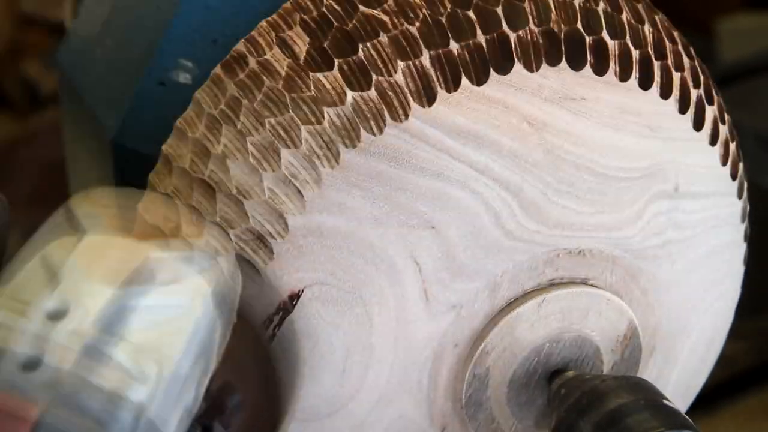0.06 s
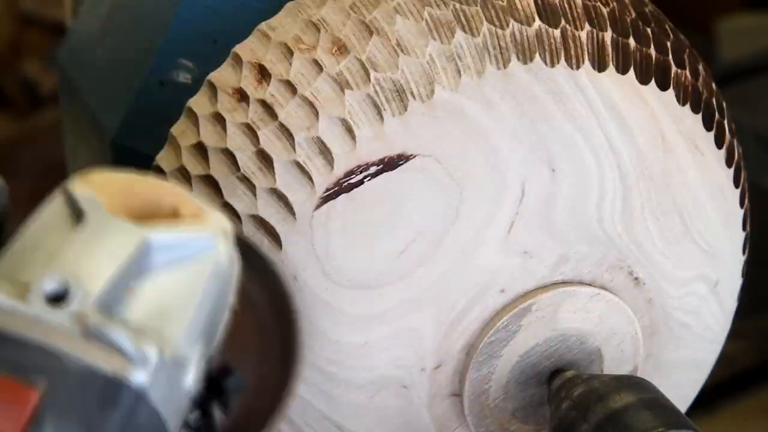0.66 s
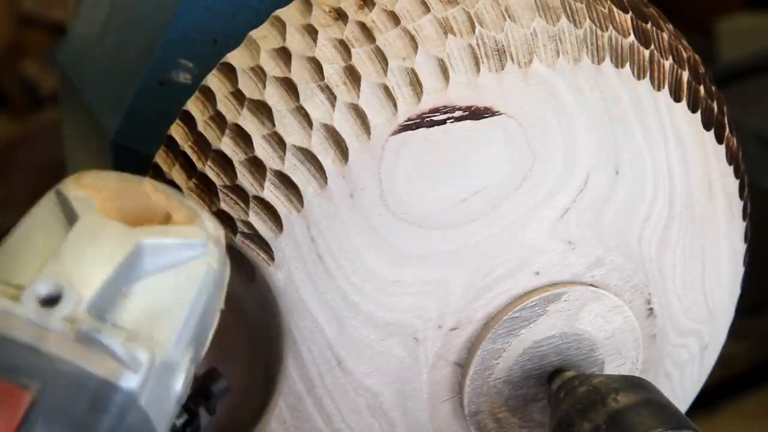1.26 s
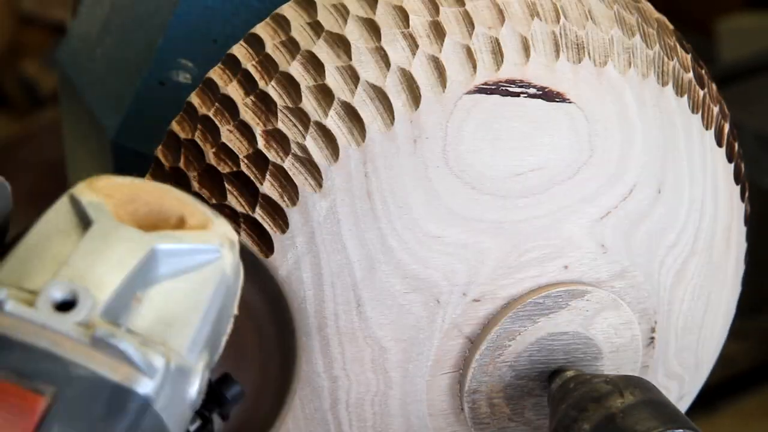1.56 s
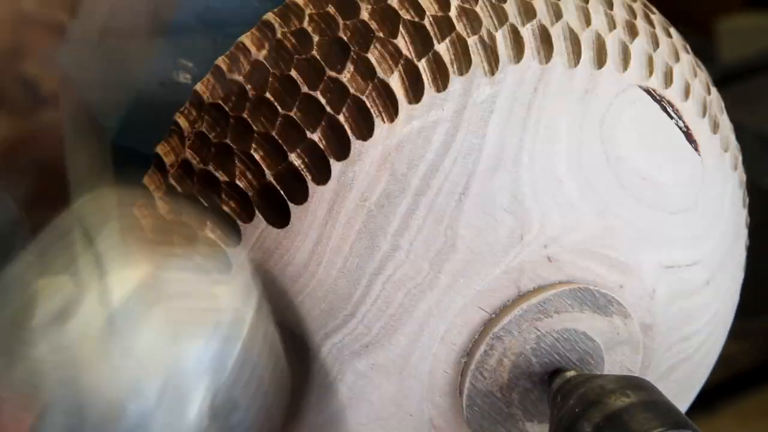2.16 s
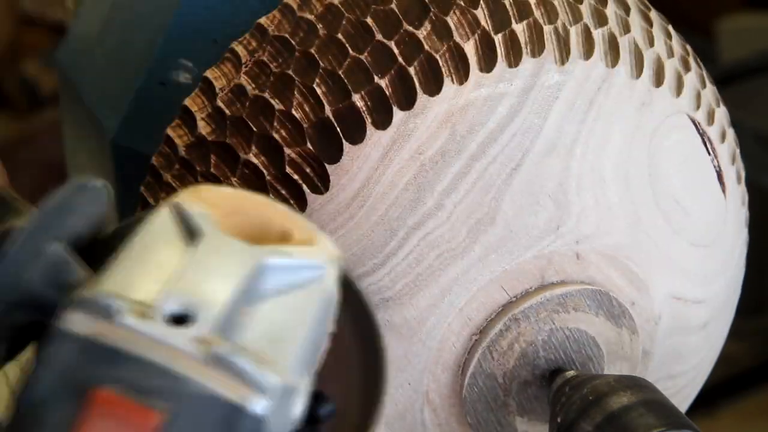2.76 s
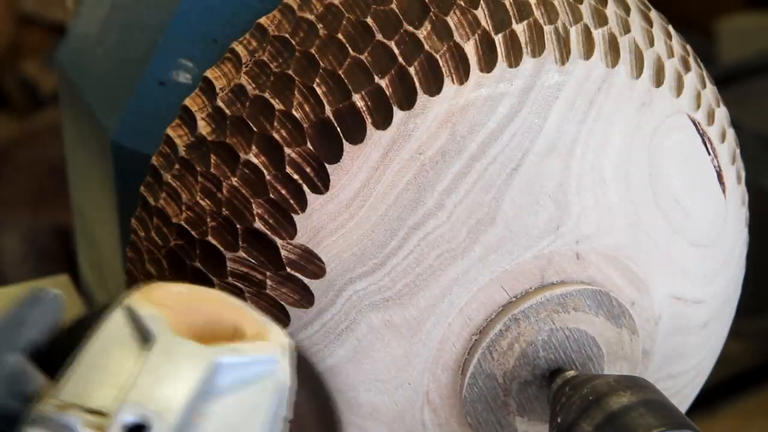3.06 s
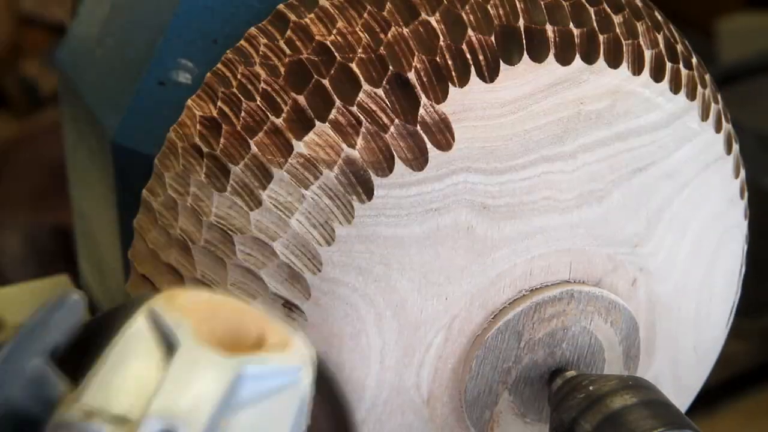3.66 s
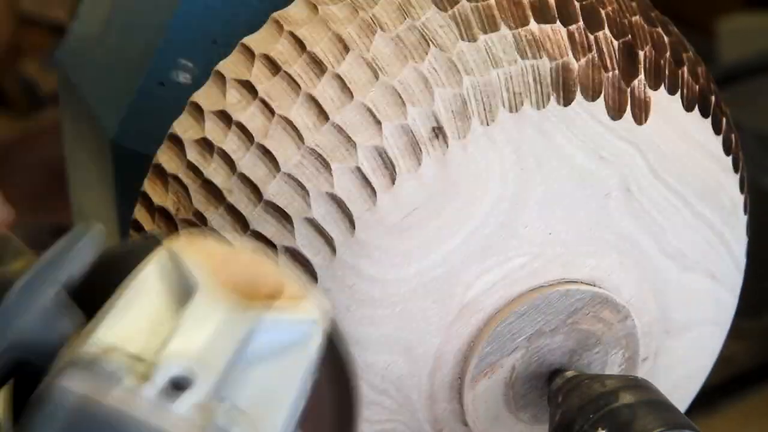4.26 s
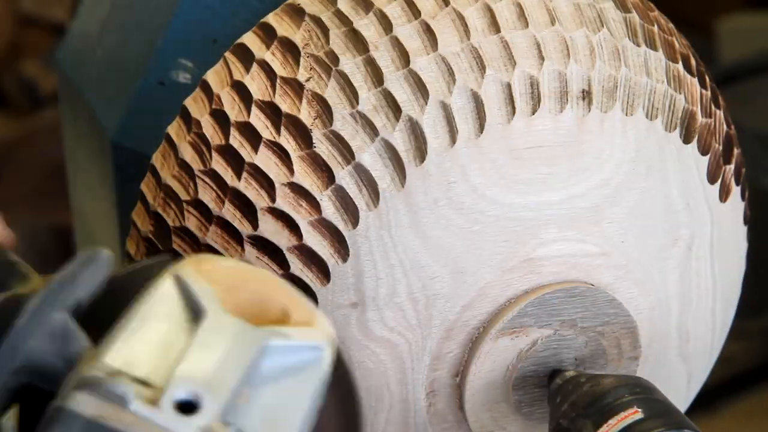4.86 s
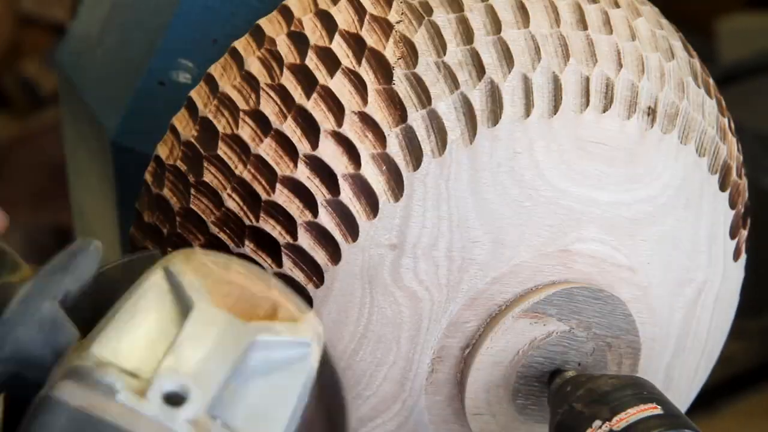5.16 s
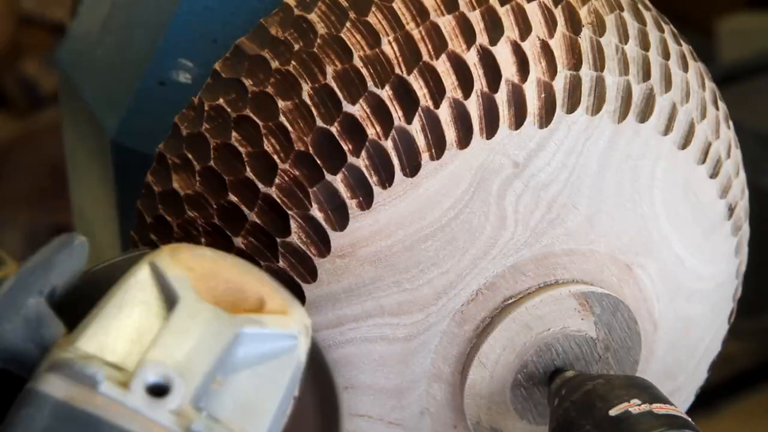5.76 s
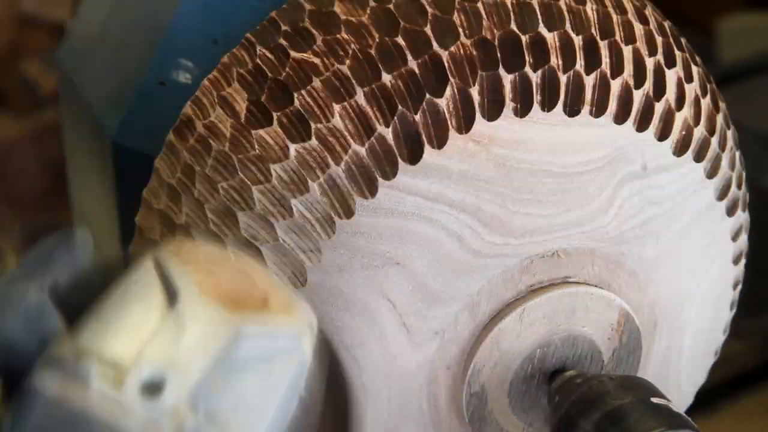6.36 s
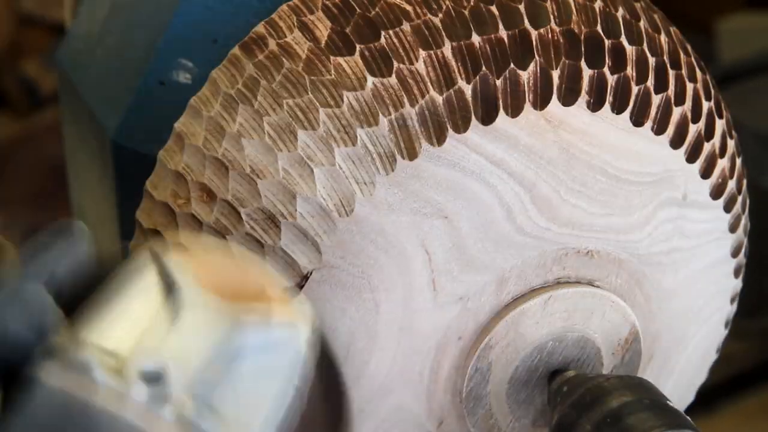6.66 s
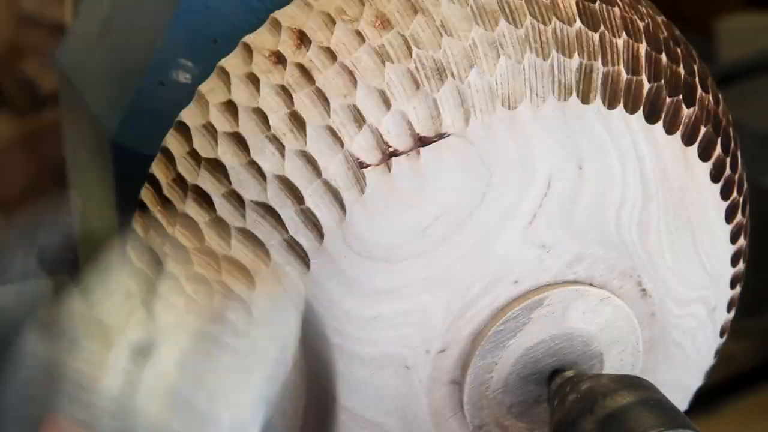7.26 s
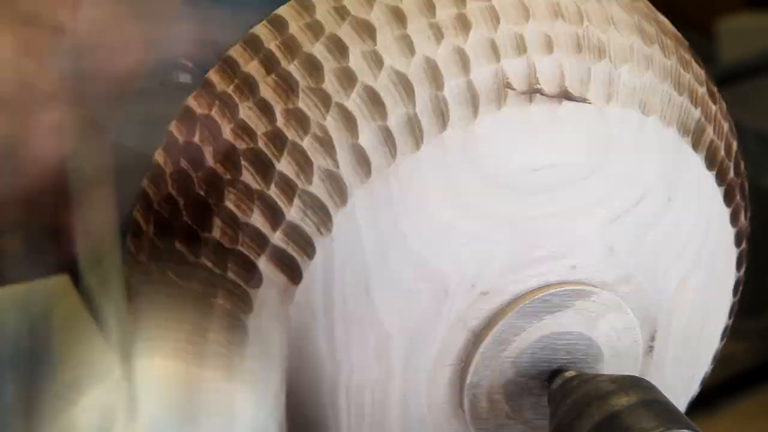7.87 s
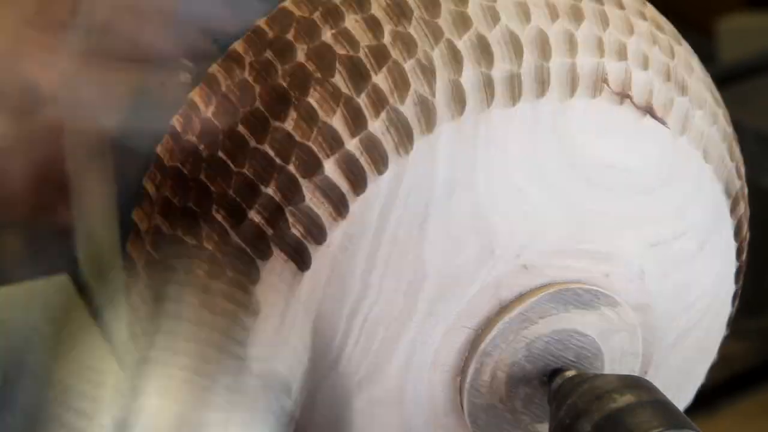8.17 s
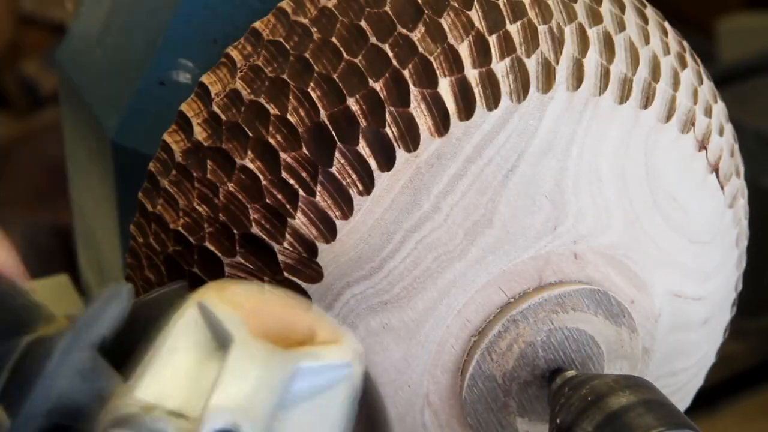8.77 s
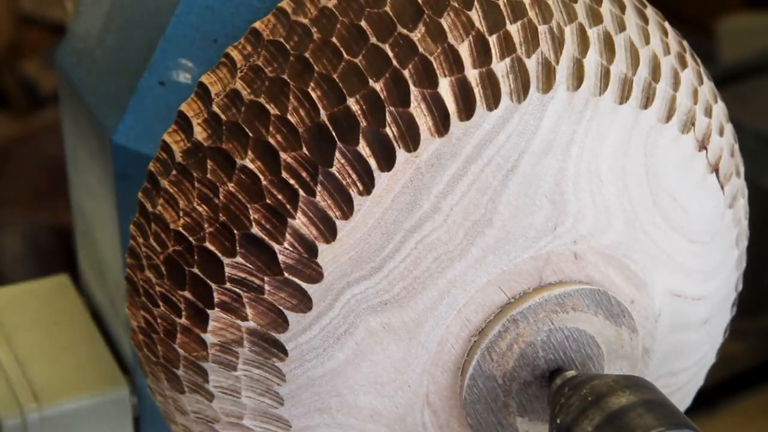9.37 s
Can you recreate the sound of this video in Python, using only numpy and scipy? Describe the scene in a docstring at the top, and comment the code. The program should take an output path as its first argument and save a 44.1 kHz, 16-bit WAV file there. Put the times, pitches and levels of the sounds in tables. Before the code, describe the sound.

A small angle grinder is already running at the start, close by, with a high gear whine over a bright, continuous fan hiss and a faint lower rush of air. Until about 8.5 seconds it carves a wooden bowl in quick groups of mostly three or four short cuts, roughly three groups a second. Each cut gives a brief rasp and a faint hum from the wood, and drags the motor pitch down. In the tiny pauses the whine climbs back with a slight puff of air, making a regular wavering rhythm. The rasps are strongest in the first second and from about 3 to 4 seconds, and lightest around 8 seconds. At about 8.6 seconds the disc lifts off with a soft, rising swish. The grinder then runs free with an even whine and hiss until the end, at about 9.4 seconds.

```python
"""Gear whine over the hiss of a cooling fan: an angle grinder scooping small hollows into a wooden bowl,
mostly three or four quick cuts to a row. Each cut makes the toothed disc rasp and the bowl hum, and drags
the motor down. Between rows air puffs through the guard and the whine climbs back.
At the end the disc lifts off with a swish, and the tool is drawn back and runs free."""
import sys
import numpy as np
from scipy import signal
from scipy.fft import rfft, irfft, next_fast_len
from scipy.io import wavfile
from scipy.ndimage import uniform_filter1d, map_coordinates

SR = 44100
rng = np.random.default_rng(int(sys.argv[2]) if len(sys.argv) > 2 else 0)


def wav_out(sig):
    """Save sig, one row per channel (or a flat mono array), as 16-bit PCM at SR to the path in sys.argv[1]."""
    wavfile.write(sys.argv[1], SR, np.round(np.clip(np.atleast_2d(sig).T, -1, 1) * 32767).astype(np.int16))


N = 414981
TIME = np.arange(N) / SR
PINION_TEETH, CROWN_TEETH, DISC_TEETH = 12, 37, 4


def amp(db):
    """Decibels to gain."""
    return 10 ** (np.asarray(db) / 20)


def unit(x):
    """Scale to rms 1."""
    return x / np.sqrt(np.mean(x ** 2) + 1e-20)


def curves(rows):
    """One value per sample for each column after the time."""
    times, *columns = np.transpose(rows)
    return [np.interp(TIME, times, column) for column in columns]


def wobble(rate_hz):
    """Smooth random curve, rate_hz knots a second."""
    knots = rng.standard_normal(int(N * rate_hz / SR) + 4)
    return map_coordinates(knots, [TIME * rate_hz], mode="nearest")


def noise(spectrum):
    """Noise of rms 1 coloured by (Hz, dB) points."""
    size = next_fast_len(N + 8192)
    hz, db = np.transpose(spectrum)
    gain = amp(np.interp(np.log(np.fft.rfftfreq(size, 1 / SR) + 1), np.log(hz), db))
    return unit(irfft(rfft(rng.standard_normal(size)) * gain, size)[:N])


def angle(hz):
    """Running phase of a changing frequency."""
    return 2 * np.pi * np.cumsum(hz) / SR


def tone(phase):
    """Sine of rms 1."""
    return np.sqrt(2) * np.sin(phase)


def resonance(phase, width_hz):
    """Noise band of rms 1 that follows the given phase."""
    return unit(wobble(width_hz) * np.cos(phase) + wobble(width_hz) * np.sin(phase))


def swells(times, sizes, width_s, delay_s=0, edge=2):
    """One swell at each time; a higher edge gives a flatter top and steeper sides."""
    out = np.zeros(N)
    for peak_s, size in zip(times + delay_s, sizes):
        near = slice(max(0, int((peak_s - .1) * SR)), int((peak_s + .1) * SR))
        out[near] += size * np.exp(-.5 * np.abs((TIME[near] - peak_s) / width_s) ** edge)
    return out


# Unloaded shaft tones as the hand turns the tool. Each row: time in seconds, orders 1 and 2 in dB.
SHAFT_LEVELS = [(0, -52, -61), (1.9, -51, -63), (2.23, -52, -43), (2.7, -55, -59), (4.5, -46, -62),
                (5.7, -49, -67), (6.6, -45, -55), (8.2, -55, -65)]
# Pauses between rows. Each row: time in seconds, then air puff, order 4, gear mesh and its octave in dB.
ROW_PAUSES = [(0, -38, -49, -39, -35), (.3, -39, -45, -43, -24), (.63, -49, -47, -38, -28),
              (1.01, -40, -35, -37, -29), (1.18, -48, -52, -31, -27), (1.53, -43, -48, -44, -29),
              (1.83, -45, -32, -44, -33), (2.18, -33.5, -49, -37, -28), (2.68, -38, -44.5, -33.5, -26.5),
              (3.19, -43, -43, -46, -30), (3.59, -48, -36, -30, -33), (3.91, -43, -46, -38, -28.5),
              (4.28, -50, -47, -26, -37), (4.54, -47, -54, -37, -36), (4.83, -43, -52, -38, -37),
              (5.11, -42, -52, -38, -28), (5.41, -42, -53, -33, -36), (5.75, -46, -53, -33, -30),
              (6.06, -44, -47, -26, -36), (6.39, -39, -36, -25, -36), (6.68, -44, -41, -24, -38),
              (6.99, -44, -40, -26, -37), (7.27, -40, -52, -30, -30), (7.59, -44, -43, -33, -34),
              (7.91, -44, -48, -27, -30), (8.22, -46, -50, -33, -37), (8.56, -44, -50.5, -43, -33)]
# Final free run. Each row: time in seconds, motor speed in Hz, orders 1, 2, 4, 12 and 24 in dB.
FREE_RUNNING = [(8.64, 590, -48, -59, -52, -29, -32), (8.71, 592.0, -49, -59, -40, -28.5, -26),
                (8.812, 594.9, -51, -59, -48, -27, -27), (8.84, 594.4, -42, -50, -48, -38, -27),
                (8.91, 596.4, -43, -55, -38, -29, -30), (8.934, 594.6, -44, -43, -51, -30, -24),
                (8.962, 594.2, -55, -44, -39, -56, -31), (8.98, 594.7, -50, -47, -58, -29, -31),
                (9.014, 590, -46, -45, -49, -29, -27), (9.044, 590, -51, -43, -43, -60, -34),
                (9.08, 593.1, -50, -49, -43, -27, -31), (9.124, 593.8, -46, -41, -37, -47, -32),
                (9.148, 595.8, -48, -42, -40, -29, -31), (9.204, 594.0, -47, -39.5, -54, -26.5, -30),
                (9.31, 592.4, -48, -39, -44, -30, -28), (9.37, 593.9, -49, -45, -55, -34, -27)]


def unloaded_levels_db(whine_lag_s=.044):
    """Level of each motor order with the disc off the wood; the whine peaks just after each puff."""
    low = list(SHAFT_LEVELS) + [(s, one, two) for s, _, one, two, *_ in FREE_RUNNING]
    high = [(s + whine_lag_s, *levels) for s, _, *levels in ROW_PAUSES]
    high += [(s, *levels) for s, _, _, _, *levels in FREE_RUNNING]
    return curves(low) + curves(high)


# Motor tones. Each row: order (multiple of motor speed), loaded level in dB, loss in dB per Hz of sag,
# flutter scale in dB, unloaded fading in dB.
MOTOR_ORDERS = [(1, -40.5, 0.34, 2.5, 1), (2, -51, -.08, 3, 1), (4, -52, .1, 3, 1.5),
                (12, -38.5, 0.26, 4, 1.5), (24, -41, 0.3, 4, 1)]
# Tool angle under load. Each row: time in seconds, tilt from octave to mesh in dB, shaft tone gain in dB.
TOOL_TILT = [(0, 5.5, -3), (2.7, 3.5, -1.5), (3.1, -3.5, 1), (5.2, 2.5, 2), (6.5, -2.5, 1.5),
             (8.5, -0.5, -0.5)]


def motor_and_gears(shaft, sag_hz, load):
    """Shaft tones and the mesh of the bevel gears, which sings loudest without load."""
    backlash = (.0073 + .015 * load) * wobble(300)  # the shaft shudders in the play of the gears
    crown = shaft * PINION_TEETH / CROWN_TEETH
    tilt_db, shaft_db = curves(TOOL_TILT)
    damped = 1 - np.exp(-sag_hz / 8.1)  # the lightest touch damps the singing
    out = np.zeros(N)
    for free_db, (order, loaded_db, loss, flutter_db, fade_db) in zip(unloaded_levels_db(), MOTOR_ORDERS):
        order = round(order)
        mesh, octave = order == PINION_TEETH, order == 2 * PINION_TEETH
        angle_db = tilt_db * (mesh - .6 * octave) + shaft_db * (order <= 2)
        db = (1 - damped) * (free_db + fade_db * wobble(14))
        db += damped * (loaded_db - loss * sag_hz + angle_db)
        db += flutter_db * (.44 + .78 * load) * wobble(85)
        # slightly eccentric gears swell the mesh once a turn
        runout = 1 + (.28 * mesh + .08 * octave) * np.cos(shaft + .5 * wobble(14))
        runout += .073 * (mesh or octave) * np.cos(crown + .5 * wobble(12))
        out += amp(db) * runout * tone(order * (shaft + backlash))
    return out


def turbulence(air, depth_db):
    """Slow, local swells of random gain over pitch and time."""
    spectrum = signal.stft(air, nperseg=512)[2]
    field = rng.standard_normal(spectrum.shape)
    for _ in range(2):
        field = uniform_filter1d(field, size=5, axis=0)
        field = uniform_filter1d(field, size=16, axis=1)
    spectrum *= amp(depth_db * unit(field))
    return unit(signal.istft(spectrum, nperseg=512)[1][:N])


# Fan outlet to wood. Each row: time in seconds, distance in metres.
OUTLET_DISTANCE = [(0, 0.067), (2.7, 0.066), (3.0, 0.061), (8.42, 0.061), (8.75, 0.088), (8.95, .13),
                   (9.41, .15)]


def bowl_reflection(air, load):
    """The wood throws the hiss back; its comb slides as the tool dips in and lifts off."""
    distance_m = curves(OUTLET_DISTANCE)[0] + .0055 * (.7 - load) + .0074 * wobble(9)
    lag_samples = 2 * distance_m / 343 * SR
    echo = map_coordinates(air, [np.arange(N) - lag_samples], mode="nearest")
    return unit(air + .094 * echo)


# Hiss at the bowl, and drawn back. Each row: frequency in Hz, relative density in dB.
NEAR_SPECTRUM = [(60, -70), (700, -30), (1250, -6.5), (1650, 0), (2050, -4.5), (2600, -0.5), (3900, 0.5),
                 (5000, 2), (6300, -2.5), (9000, -1.5), (11500, -0.5), (13600, -4.5), (14500, -5),
                 (15700, -17.5)]
AWAY_SPECTRUM = [(60, -70), (700, -31), (1150, -9), (1600, 2.5), (2300, 1.5), (3100, 3.5), (3900, 1),
                 (5400, 2), (6400, -2), (9000, -0.5), (12000, 2.5), (13500, -2), (14600, -7), (15700, -8)]


def fan_hiss(shaft, load, away):
    """Air from the fan and the spinning disc; the fan blows less when the motor labours."""
    air = np.sqrt(1 - away) * noise(NEAR_SPECTRUM) + np.sqrt(away) * noise(AWAY_SPECTRUM)
    air = bowl_reflection(turbulence(air, depth_db=.83), load)
    level_db = -30 - .75 * load ** 4 + .46 * wobble(25)
    return air * amp(level_db) * (1 + .07 * np.cos(shaft))


# Colour of the cooling air. Each row: frequency in Hz, relative density in dB.
RUSH_SPECTRUM = [(20, -52), (60, -28), (95, -16.5), (135, -22), (220, -10.5), (280, -12), (370, -3.5),
                 (480, -5), (650, 2.5), (950, 3), (1250, -2), (2200, -19.5)]
# Its strength. Each row: time in seconds, level in dB.
RUSH_ENVELOPE = [(0, -47.5), (2.5, -47), (4.2, -45), (5.9, -46.5), (6.9, -45), (7.6, -47), (8.8, -46.5),
                 (8.92, -51), (9.41, -49.5)]


def cooling_rush():
    """Low, wavering rush of the cooling air."""
    return amp(curves(RUSH_ENVELOPE)[0] + 1.4 * wobble(16)) * noise(RUSH_SPECTRUM)


def gap_whistle(away, centre_hz=3270, steady_db=-49, away_db=-42.5):
    """Air resonates in the guard's gap: a puff in each pause, a stronger flow once drawn back."""
    times, puff_db, *_ = np.transpose(ROW_PAUSES)
    flow = amp(steady_db) + swells(times, amp(puff_db), width_s=.02) + amp(away_db) * away
    return flow * amp(1.5 * wobble(30)) * resonance(2 * np.pi * centre_hz * TIME, width_hz=950)


# Air modes of the guard. Each row: frequency in Hz, width in Hz, base level in dB.
GUARD_RESONANCES = [(1536, 130, -52), (2777, 260, -42.5), (4750, 400, -45.5), (5507, 330, -45),
                    (11970, 550, -43.5)]


def guard_ring(load, away):
    """Air resonates under the guard, most when loaded and close to the bowl."""
    ring = np.zeros(N)
    for hz, width_hz, db in GUARD_RESONANCES:
        gain = amp(db + 1.64 * wobble(11) + 1.15 * wobble(70))
        ring += gain * resonance(2 * np.pi * hz * TIME, width_hz)
    return ring * amp(3.7 * (load - 1.5) - 3 * away)


# Modes of the steel disc. Each row: frequency in Hz, width in Hz, level at the bowl in dB.
DISC_RESONANCES = [(6180, 55, -46.5), (10113, 70, -54.5), (15149, 50, -55)]
# Drone of the free disc. Each row: multiple of disc speed, level in dB.
DRONE_ORDERS = [(1, -68), (2, -60.5)]


def disc_ring(disc, away):
    """The disc rings in its own modes; drawn back, it rings less and drones."""
    ring = sum(amp(db + .7 * wobble(6)) * resonance(2 * np.pi * hz * TIME, width_hz)
               for hz, width_hz, db in DISC_RESONANCES)
    drone = sum(amp(db) * resonance(round(order) * disc, width_hz=30) for order, db in DRONE_ORDERS)
    return ring * amp(-9 * away) + away * drone


# Rows of cuts. Each row: first and last cut in seconds, cut count, motor drag in Hz before smoothing,
# rasp level in dB, rasp rise along the row in dB.
CUT_ROWS = [(.078, .241, 3, 55.8, -35, 6), (.415, .569, 3, 58, -34, 2.5),
            (.717, .943, 4, 52.1, -35.5, -0.5), (1.094, 1.094, 1, 53.9, -41, 0.5),
            (1.29, 1.448, 3, 59, -40.5, 1.5), (1.604, 1.768, 3, 64.1, -44, 2.5),
            (1.919, 2.079, 3, 68, -47, 7), (2.297, 2.544, 4, 75.8, -48, 5),
            (2.84, 3.115, 4, 69, -37.5, 10.5), (3.281, 3.512, 4, 62, -34, 3),
            (3.664, 3.815, 3, 60.9, -32.5, 4), (3.971, 4.191, 4, 54.96, -33, 2),
            (4.342, 4.482, 3, 56, -38.5, 3), (4.621, 4.771, 3, 66.1, -38.5, -4),
            (4.905, 5.057, 3, 62, -45, -6.5), (5.195, 5.337, 3, 60.9, -47, 6),
            (5.493, 5.66, 3, 71, -40, 11.5), (5.838, 5.995, 3, 72, -37.5, 6.5),
            (6.166, 6.311, 3, 67.9, -39, 0), (6.468, 6.602, 3, 57.1, -36.5, 4),
            (6.762, 6.909, 3, 45.1, -37, -3), (7.063, 7.21, 3, 52.04, -35, -2),
            (7.361, 7.512, 3, 53, -38.5, 1.5), (7.67, 7.835, 3, 67.1, -46.5, -2),
            (7.989, 8.136, 3, 68, -53, 4), (8.279, 8.494, 4, 64.1, -53, -0.5)]


def cuts(drag_share_per_db=.018, mid_row_ease=.12):
    """Time, drag and rasp level of each evenly paced cut; leaning in drags more, mid-row eases off."""
    out = []
    for first_s, last_s, count, drag_hz, rasp_db, rise_db in CUT_ROWS:
        times = np.linspace(first_s, last_s, max(1, round(count)))
        along = np.linspace(-.5, .5, len(times))
        ends = (2 * along) ** 2
        press = 1 + drag_share_per_db * rise_db * along + mid_row_ease * (ends - ends.mean())
        out += zip(times, drag_hz * press, rasp_db + rise_db * along)
    return np.transpose(out)


def tooth_rasp(disc):
    """The teeth enter and leave the wood abruptly, rasping and throwing one chip a tooth."""
    times, _, rasp_db = cuts()
    teeth = DISC_TEETH * disc + .099 * wobble(150)
    bite = swells(times, amp(rasp_db), width_s=.016, delay_s=-.0063, edge=2.9)
    rasp = bite * (tone(teeth) + amp(-26) * tone(2 * teeth) + amp(-24.5) * tone(2 * disc))
    chip_bursts = np.exp(1.1 * np.cos(teeth) + .37 * np.cos(disc))
    chips = unit(chip_bursts * noise([(500, -33), (1500, .5), (2800, 8), (5000, 1), (14000, -6)]))
    spray = amp(-40) * swells(times, np.ones(len(times)), width_s=.014, delay_s=-.0043)
    return rasp + spray * chips


def bowl_hum(disc, usual_drag_hz=62, db_per_hz=.11):
    """Just after each bite the bowl hums at the disc's turning rate, louder for a deeper cut."""
    times, drag_hz, _ = cuts()
    hum_db = -52 + db_per_hz * (drag_hz - usual_drag_hz) + 1.6 * rng.standard_normal(len(times))
    press = swells(times, amp(hum_db), width_s=.013, delay_s=.014)
    return press * tone(disc + .16 * wobble(60))


def motor_sag_hz(inertia_s=.0355):
    """Speed lost to the cuts; the rotor's inertia smooths the fall and the recovery."""
    times, drag_hz, _ = cuts()
    pole = np.exp(-1 / (inertia_s * SR))
    return signal.lfilter([1 - pole], [1, -pole], swells(times, drag_hz, width_s=.0137))


# Rising swish of air. Each row: time in seconds, centre in Hz, level in dB.
SWISH_PATH = [(8.48, 3198, -80), (8.53, 3400, -42), (8.58, 3815, -38), (8.64, 4394, -40), (8.72, 4524, -46),
              (8.8, 4705, -41), (8.84, 4750, -44), (8.88, 4800, -80)]


def lift_off_swish():
    """The air stream slips off the rim of the bowl as the disc lifts."""
    hz, db = curves(SWISH_PATH)
    return amp(db) * resonance(angle(hz), width_hz=690)


# Motor speed while carving, before sag. Each row: time in seconds, speed in Hz.
NO_LOAD_SPEED = [(0, 585), (.7, 594), (1.3, 587), (2.2, 595), (2.8, 595), (3.9, 595), (4.9, 588),
                 (6.1, 586), (7, 586.6), (8, 587)]
# Drawing the tool back. Each row: time in seconds, share of the way from 0 to 1.
WITHDRAWAL = [(8.6, 0.0019), (8.92, 0.98)]


def scene():
    """The motor drives gears, fan and disc; both channels carry the same sound."""
    sag_hz = motor_sag_hz()
    load = 1 - np.exp(-sag_hz / 9)
    free_hz, = curves(list(NO_LOAD_SPEED) + [(s, hz) for s, hz, *_ in FREE_RUNNING])
    shaft = angle(free_hz - sag_hz)
    disc = shaft * PINION_TEETH / CROWN_TEETH
    away, = curves(WITHDRAWAL)
    whine = motor_and_gears(shaft, sag_hz, load)
    air = fan_hiss(shaft, load, away) + cooling_rush() + gap_whistle(away) + guard_ring(load, away)
    carving = disc_ring(disc, away) + tooth_rasp(disc) + bowl_hum(disc)
    mix = whine + air + carving + lift_off_swish()
    return np.array([mix, mix])


def record(dry, low_cut_hz=79, top_hz=15740):
    """Roll off the deep bass and remove everything above the band limit."""
    size = next_fast_len(N + 8192)
    hz = np.fft.rfftfreq(size, 1 / SR)
    low_cut = hz ** 2 / np.sqrt(hz ** 4 + low_cut_hz ** 4)
    return irfft(rfft(dry, size) * low_cut * (hz < top_hz), size)[:, :N]


dry = scene()
out = record(dry)
wav_out(out)
```